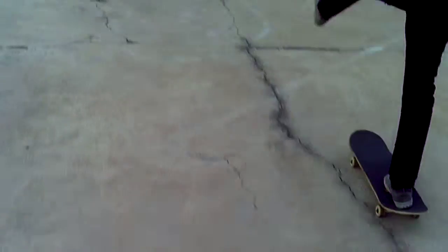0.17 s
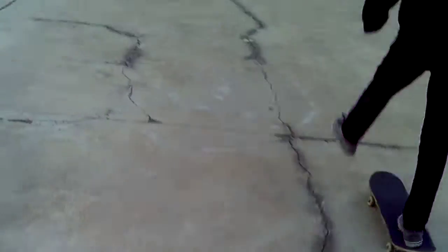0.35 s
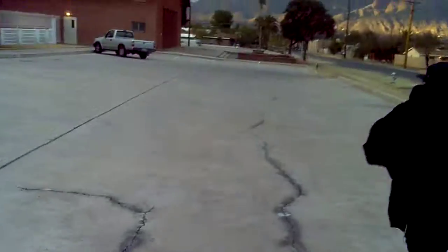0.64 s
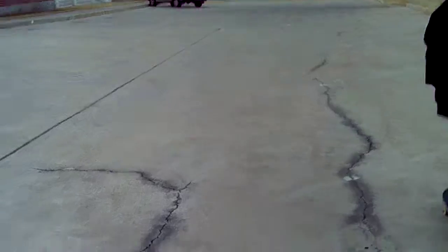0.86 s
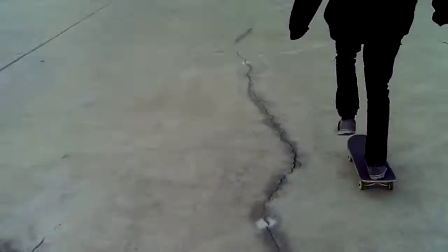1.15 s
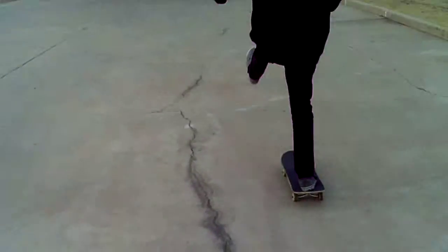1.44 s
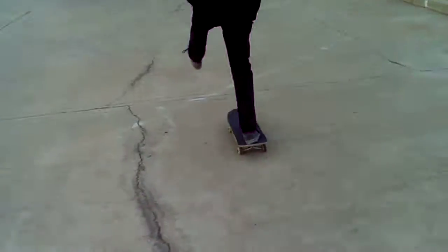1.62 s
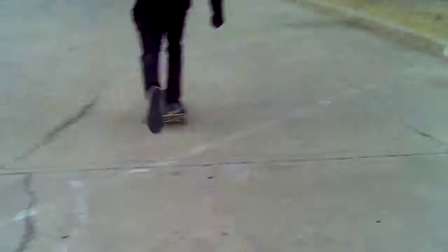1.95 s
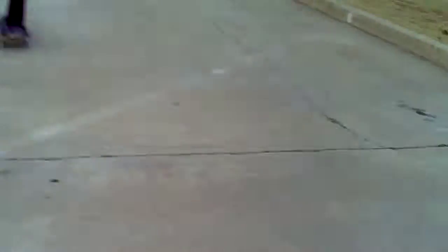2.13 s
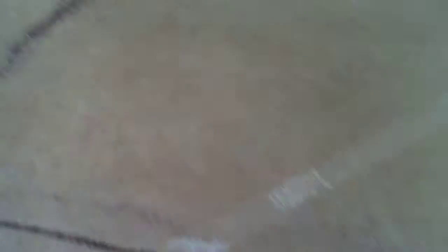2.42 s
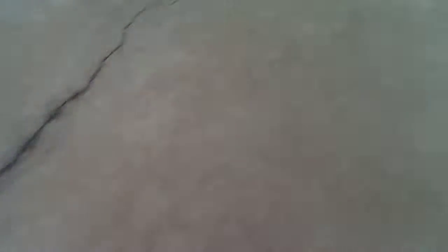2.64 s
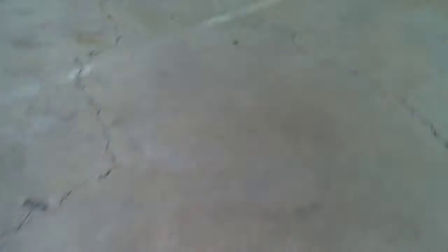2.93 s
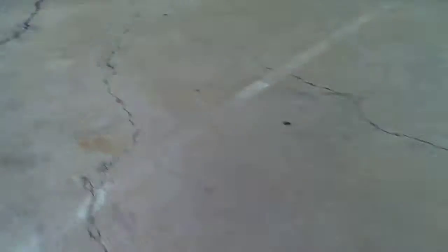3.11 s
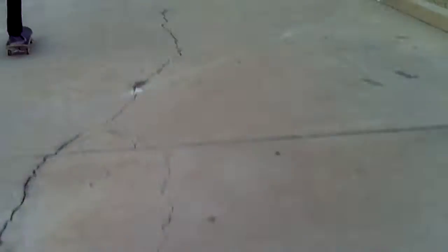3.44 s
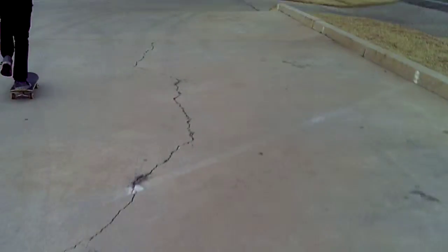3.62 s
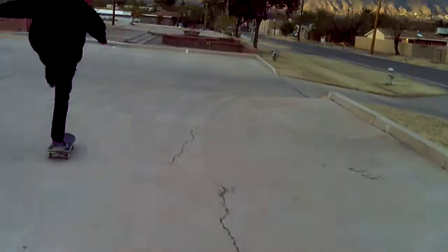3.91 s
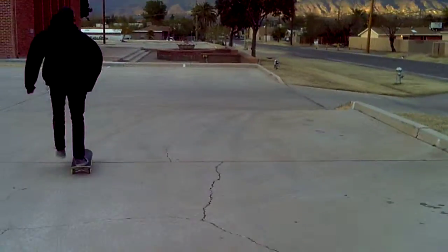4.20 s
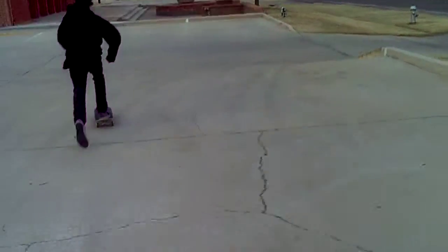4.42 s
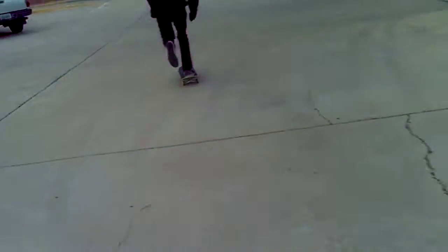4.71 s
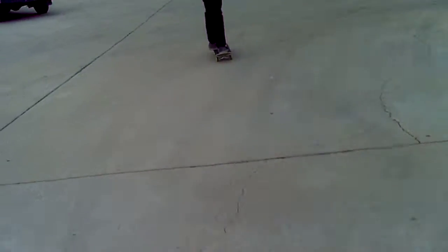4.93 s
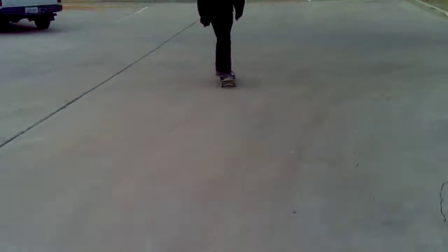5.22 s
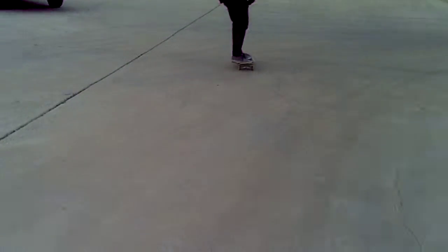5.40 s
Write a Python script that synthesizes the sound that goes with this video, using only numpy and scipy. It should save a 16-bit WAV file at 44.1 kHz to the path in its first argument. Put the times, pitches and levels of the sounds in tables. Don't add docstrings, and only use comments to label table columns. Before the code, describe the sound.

A skateboard rolls over rough, cracked concrete outdoors, heard through a small hand-held microphone with dull, limited treble. From the start there is a grainy, hollow wheel roar with small knocks, swelling near 0.4 s. Hard clacks at joints and stones crowd 0.8 to 1.4 s; the strongest, at about 1.0 and 1.33 s, are overloaded, the latter with crunching grit and a short metallic ring. The roll dips around 1.75 s, then surges with sandy grinding and several knocks from 2.0 to 2.3 s. After a lull, sharp paired clicks snap at 2.8 s. Moderate rolling returns near 3 s, with knocks at 3.4, 3.8 and 4.2 s. From there the board recedes: thin rumble, faint push scuffs, and soft, dull taps until about 5.4 s, fading by 5.6 s. Low wind puffs flutter throughout, heaviest between 1.9 and 3.3 s.

```python
import sys
import numpy as np
from scipy import signal
from scipy.fft import rfft, irfft, next_fast_len
from scipy.io import wavfile
from scipy.ndimage import uniform_filter1d, map_coordinates

SR = 44100
rng = np.random.default_rng(int(sys.argv[2]) if len(sys.argv) > 2 else 0)


def to_wav(s):
    ch = np.atleast_2d(s).T
    pcm = np.round(np.clip(ch, -1, 1) * 32767)
    wavfile.write(sys.argv[1], SR, pcm.astype(np.int16))


N = 245195


def amp(db):
    return 10 ** (np.asarray(db) / 20)


def unit(x):
    return x / np.sqrt(np.mean(x ** 2) + 1e-20)


def along(points, hz):
    f, v = np.transpose(points)
    return np.interp(np.log(hz + 1), np.log(f + 1), v)


def curves(rows):
    s, *columns = np.transpose(rows)
    t = np.arange(N) / SR
    return [np.interp(t, s, column) for column in columns]


def swells(rows):
    t = np.arange(N) / SR
    return sum(db * np.exp(-((t - s) / half) ** 2) for s, half, db in rows)


def wobble(rate):
    knots = rng.standard_normal(int(N * rate / SR) + 4)
    return map_coordinates(knots, [np.arange(N) * rate / SR])


def filtered(x, response):
    size = next_fast_len(x.shape[-1] + 8192)
    spectrum = rfft(x, size) * response(np.fft.rfftfreq(size, 1 / SR))
    return irfft(spectrum, size)[..., :x.shape[-1]]


def below(hz, edge_hz):
    return 1 / (1 + (hz / edge_hz) ** 8)


def bands(x, edges_hz):
    lows = [filtered(x, lambda hz: below(hz, edge)) for edge in edges_hz]
    return np.diff([0 * x, *lows, x], axis=0)


# t/s, level/dB
WIND = [(0, -42), (.34, -46), (1.0, -41.5), (1.7, -46.5), (2.1, -33), (2.75, -39.5), (3.6, -42), (4.6, -37),
        (5.25, -47)]
# t/s, swell level/dB
GUSTS = [(0.699, 11), (1.08, 5), (1.33, 6.5), (1.531, 4), (1.919, 10.5), (2.0, 11.5), (2.301, 8.5),
         (2.49, 13), (2.58, 4.5), (2.88, 2.5), (3.099, 10.5), (3.23, 12), (3.589, 5), (3.78, 6.5),
         (3.92, 7), (4.06, 6.5), (4.23, 3), (4.379, 2), (4.799, 3), (4.91, 5.5), (5.5, 5)]
GUST_S = .045
# f/Hz, level/dB per Hz
BUFFET = [(7.1, -40.5), (12, 5.5), (38, -1.5), (151, -11.5), (190, -8), (250, -38), (420, -120)]


def wind():
    rumble = filtered(rng.standard_normal(N), lambda hz: amp(along(BUFFET, hz)))
    lumpy = amp(1.6 * wobble(16)) * rumble
    puffs_db = swells([(s, GUST_S, db) for s, db in GUSTS])
    return amp(curves(WIND)[0] + puffs_db) * unit(lumpy)


# t/s, peak level/dB, pitch f/Hz
GRAINS = [(0.0179, -34, 2400), (0.195, -31, 2300), (0.4844, -39, 2470), (0.6438, -32, 2410),
          (1.0882, -35, 4300), (1.237, -25, 2870), (1.296, -34, 2920), (1.333, -17.5, 2750),
          (1.8962, -31.5, 2550), (2.586, -43, 4200), (2.792, -18, 2400), (2.7945, -27, 3400),
          (3.105, -41, 2410), (3.491, -40, 2800), (3.7632, -43, 3180), (4.053, -35.5, 3780),
          (4.11, -32.5, 3300), (4.198, -32, 2200), (4.292, -46, 3400), (4.4, -45, 4110),
          (4.8774, -50, 2490)]
SNAP_CYCLES = 1.1


def ticks():
    out, t = np.zeros(N + SR), np.arange(256) / SR
    for s, db, hz in GRAINS:
        age = t * hz / SNAP_CYCLES
        click = np.sin(2 * np.pi * hz * t) * age * np.exp(1 - age)
        out[round(s * SR):][:len(t)] += amp(db - 1.5) * click
    return out[:N]


# f/Hz, level/dB per Hz
BOARD = [(59, -50), (100, -21.5), (259, -10), (356, -7), (421, -7), (473, 2), (550, 2.5), (719, -1.5),
         (1000, -9), (1190, -4), (1800, -27), (2030, -30), (2880, -37.5), (3950, -37.5), (5430, -49),
         (7060, -85.5), (11900, -120)]
# f/Hz, width/Hz, level/dB
RINGS = [(514, 64, 1.5), (620, 29, -3), (700, 85, 1.5), (1156, 270, -3.5), (1520, 570, 1.5),
         (2440, 490, -2), (3330, 130, 3), (4060, 750, 4.5)]


def knock():
    size = 8192
    hz = np.fft.rfftfreq(size, 1 / SR)
    rings_db = sum(db / (1 + (2 * (hz - centre) / width) ** 2) for centre, width, db in RINGS)
    cepstrum = irfft(np.log(amp(along(BOARD, hz) + rings_db) + 1e-6), size)
    cepstrum[1:size // 2] *= 2
    cepstrum[size // 2 + 1:] = 0
    return irfft(np.exp(rfft(cepstrum)), size)[:size // 2]


# t/s, peak level/dB, hardness/dB, flight/s, far edge over the first/dB
JOINTS = [(.173, -17, -3.5, 0.02, 9), (0.8409, -8.5, 8, .007, -2.5), (1.021, -1, -29, .015, -2),
          (1.235, -14, 5.5, .008, -0.5), (1.3322, 1, 1, 0.0046, -10), (2.195, -28, 1, .019, -2),
          (2.7909, -9.5, 8, .004, -0.5), (2.857, -9, 3, .006, -1), (3.408, -13, 0, 0.0094, 1),
          (3.4908, -13, 0, .006, -4), (4.098, -25.5, 7.5, .013, 6), (4.183, -9.5, -8.5, 0.013, -5.5),
          (4.855, -22, -2, 0.018, 3), (5.187, -15.5, -15, 0.01, -9), (5.283, -14.5, -20, 0.0077, -3),
          (5.368, -22.5, -14, 0.034, -0.5)]
# t/s, peak level/dB, hardness/dB
STONES = [(.012, -18, -1), (0.406, -8.5, -17), (0.576, -21.5, 8), (.642, -20.5, 6), (0.8573, -5.5, 0),
          (.949, -12.5, 0.5), (1.086, -17, -2.5), (1.296, -31.5, 16), (1.344, -7, -2), (1.395, -12, -11.5),
          (1.987, -9.5, 0.5), (2.057, -17, 9.5), (2.106, -11.5, 2), (2.166, -13, -3.5), (2.266, -6.5, -20),
          (2.587, -27, -8), (2.828, -17, 2), (3.12, -15.5, -1.5), (3.169, -17, -7), (3.825, -9, -23),
          (4.052, -14, 2.5), (4.291, -37.5, 12), (4.496, -15.5, -5.5), (4.815, -23.5, -10),
          (4.888, -23, 1.5), (4.921, -22, 1)]
# level relative to the blow's peak level/dB, share of hardness followed
BLOW = [
    (-16, .1),
    (-4.5, 0.17),
    (-6.5, 0.9),
    (-23.5, 1),
    (-32, .7),
]
# f/Hz, level/dB, 60 dB decay time/s before the cap AXLE_LONGEST_S
AXLE = [
    (922, 1.5, 0.062),
    (1344, -1.5, 0.072),
    (2266, -19, 0.1),
]
AXLE_DB, AXLE_FOLLOWS, AXLE_LONGEST_S = -9, 0.98, 0.025
# f/Hz, level/dB per Hz
CRACK = [(1120, -31), (1900, 0.5), (2020, -4.5), (2880, -17.5), (3480, -12.5), (4340, -15.5), (5430, -42),
         (7060, -75.5), (11900, -120)]
RISE_S, CRUSH_S, REBOUNDS_S = .0012, .0035, .0045
THUD_HZ, DECK_HZ, TRUCK_HZ, HISS_HZ = 352, 928, 1780, 2770


def joints(tap):
    lead = 256
    out, t = np.zeros(N + SR), (np.arange(4096) - lead) / SR
    near_edges = [row[:3] for row in JOINTS]
    far_edges = [(s + flight, db + far_db, hard) for s, db, hard, flight, far_db in JOINTS]
    hits = [*near_edges, *far_edges, *STONES]
    draws = rng.standard_normal((len(hits), 2, len(t)))
    share_db, follows = np.transpose([*BLOW, (AXLE_DB, AXLE_FOLLOWS)])
    after = np.maximum(t, 0)
    rise = 1 - np.exp(-after / RISE_S)
    for (s, db, hard_db), (size, pick) in zip(hits, draws):
        blows = size * (pick > 1.6) * (t >= 0) * np.exp(-(t / REBOUNDS_S) ** 2)
        blows[lead] = 1.0
        board = bands(signal.fftconvolve(blows, tap)[:len(t)], [THUD_HZ, DECK_HZ, TRUCK_HZ])

        grit = size * rise * (np.exp(-after / CRUSH_S) + 0.14 * np.exp(-after / 0.0083))
        crushed = bands(filtered(grit, lambda hz: amp(along(CRACK, hz))), [HISS_HZ])

        ring = 0
        for (hz, level, t60), r in zip(AXLE, pick):
            decay_db = 60 * after / min(t60, AXLE_LONGEST_S)
            ring = ring + amp(level + 2 * r - decay_db) * np.sin(2 * np.pi * hz * after)

        parts = np.vstack([board[:-1], crushed, rise * ring])
        gains = amp(db + share_db + follows * hard_db) / np.abs(parts).max(axis=1)
        out[round(s * SR):][:len(t)] += gains @ parts
    return out[lead:N + lead]


def patches(x, patchy_db):
    z = signal.stft(x, nperseg=1024)[2]
    field = uniform_filter1d(rng.standard_normal(z.shape), size=10, axis=0)
    field = uniform_filter1d(field, size=4, axis=1)
    return signal.istft(z * amp(patchy_db * unit(field)), nperseg=1024)[1][:N]


# t/s, wheel load as heard at the distance level/dB, sand under the wheels level/dB
ROLL = [(0, -22, -55), (.42, -18, -49.5), (.8, -26.5, -51.5), (1.05, -18.5, -54), (1.33, -24.5, -55),
        (1.76, -35.5, -56.5), (2.03, -25, -42.5), (2.14, -14.5, -51.5), (2.32, -24.5, -57),
        (2.42, -34, -56), (2.78, -33.5, -50), (2.99, -23, -57.5), (3.16, -30.5, -57), (3.56, -26.5, -59),
        (4.05, -29.5, -54), (4.25, -35, -64.5), (5.14, -35.5, -64), (5.56, -42, -72.5)]
# t/s, half length/s, swell level/dB
SCUFFS = [(.2, 0.088, 3), (.57, .07, 2), (.97, 0.094, 3.5), (1.4, 0.044, 2), (1.69, 0.061, 5),
          (1.93, 0.064, 1.5), (2.1, .06, 2), (2.43, 0.071, 3.5), (3.6, 0.14, 0.5), (4.4, 0.12, 0.5),
          (4.9, 0.079, 1.5), (5.3, 0.056, 2)]
# t/s, level/dB
WEIGHT = [(0, -0.5), (.5, 1.5), (.9, 5.5), (1.2, 2.5), (1.4, 0.5), (1.9, 3), (2.1, -2), (2.4, 10.5),
          (2.7, -3.5), (2.95, 4), (3.15, -2.5), (3.34, 3.5), (3.65, -4.5), (4.0, -5.5), (4.14, 1), (4.5, 1),
          (5.0, -1), (5.42, -5)]
# mean level/dB, then shares of load, sand, scuffs and weight followed
LAYERS = [
    (-40.5, 0.54, 0.21, 0.26, 1),
    (-30.5, 0.89, 0.045, 0.027, 0.19),
    (-36.5, 0.44, 0.44, 0.38, 0),
    (-56.5, 0.096, 1, 1.2, 0),
    (-64.5, 0.22, 0.63, 1.7, 0),
]


def rolling(tap):
    chance, size = rng.random(N), rng.standard_normal(N)
    pebbles = (chance < 500 / SR) * np.clip(size, -2.5, 2.5)
    force = rng.standard_normal(N) + 0.45 * unit(pebbles)
    force = force * amp(.2 * wobble(14) + .5 * wobble(45))
    body = signal.fftconvolve(patches(force, patchy_db=1.25), tap)[:N]
    parts = bands(body, [THUD_HZ, DECK_HZ, TRUCK_HZ, HISS_HZ])

    load, sand = [curve - curve.mean() for curve in curves(ROLL)]
    scuff = swells(SCUFFS)
    weight = curves(WEIGHT)[0]
    out = np.zeros(N)
    for (db, by_load, by_sand, by_scuff, by_weight), part in zip(LAYERS, parts):
        level_db = db + by_load * load + by_sand * sand + by_scuff * scuff + by_weight * weight
        out += amp(level_db) * unit(part)
    return out


def scene():
    tap = knock()
    return (rolling(tap) + joints(tap) + ticks() + wind())[None]


TOP_HZ = 5750


def record(dry):
    x = dry / (1 + np.abs(dry / .8) ** 5) ** (1 / 5)
    x = filtered(x, lambda hz: 1 / (1 + (hz / TOP_HZ) ** 24)) + .006
    x[:, :3] -= amp(-25)
    return np.clip(x, -.705, .711) + amp(-101) * rng.standard_normal(dry.shape)


dry = scene()
out = record(dry)
to_wav(out)
```